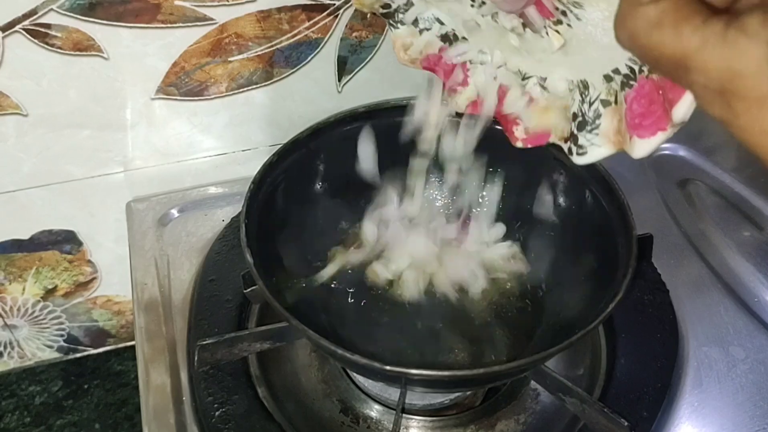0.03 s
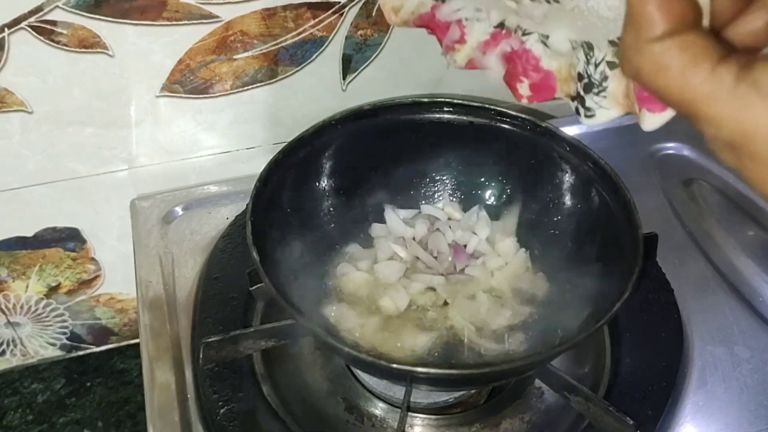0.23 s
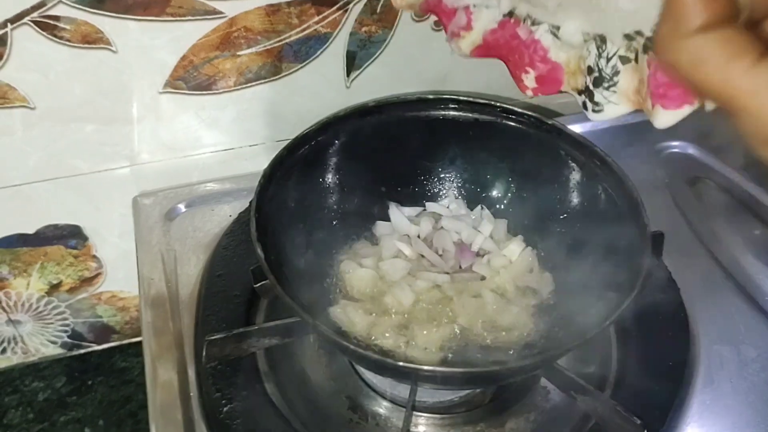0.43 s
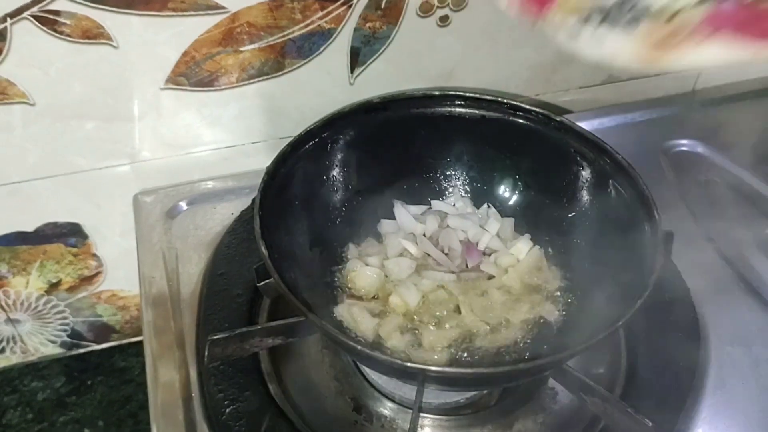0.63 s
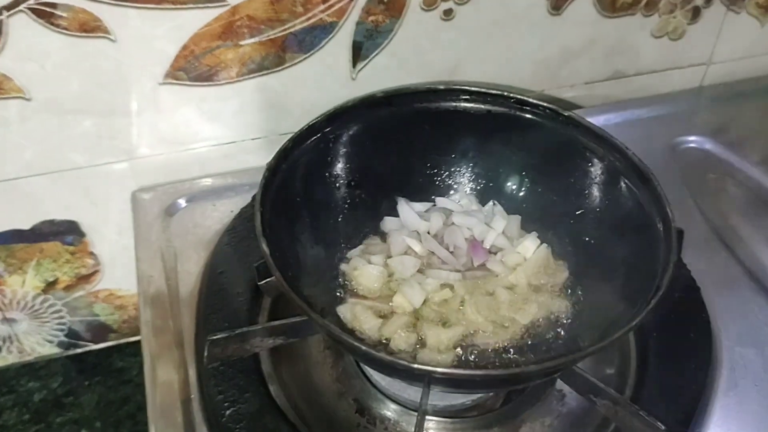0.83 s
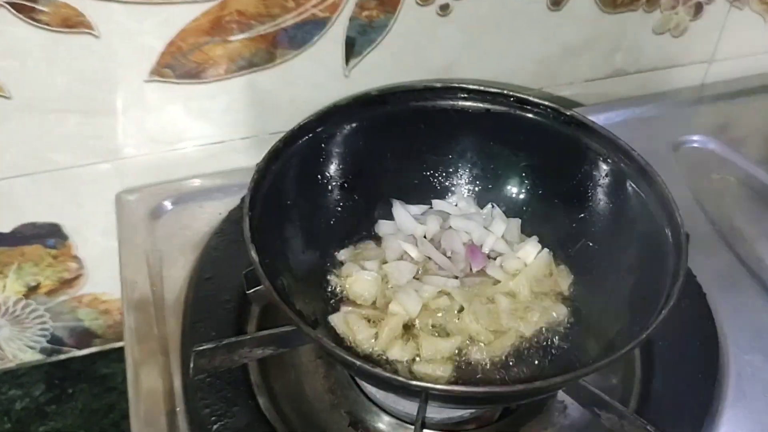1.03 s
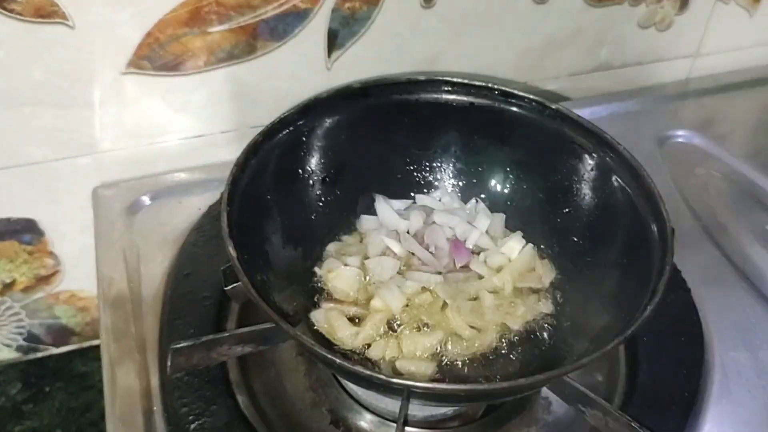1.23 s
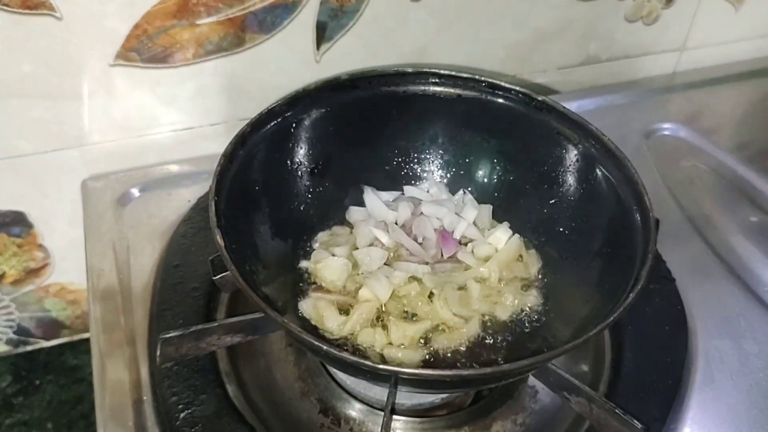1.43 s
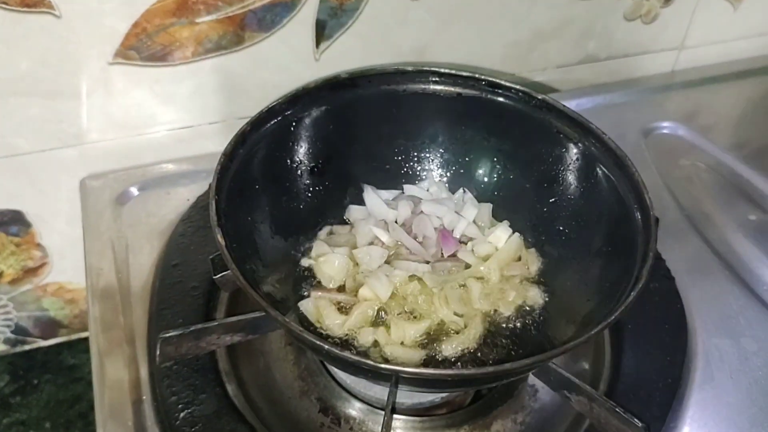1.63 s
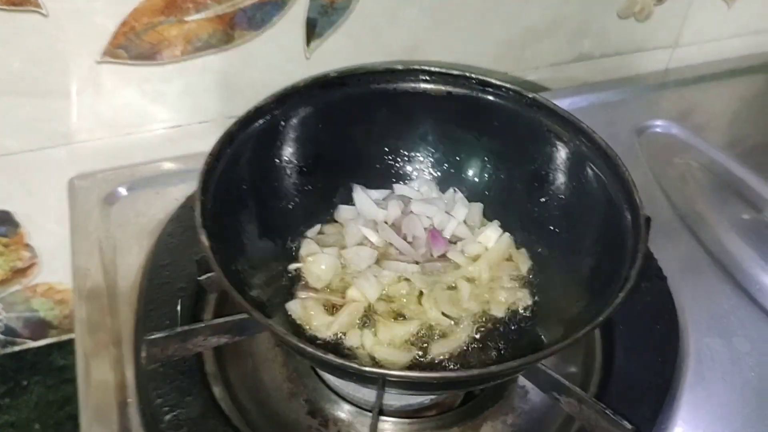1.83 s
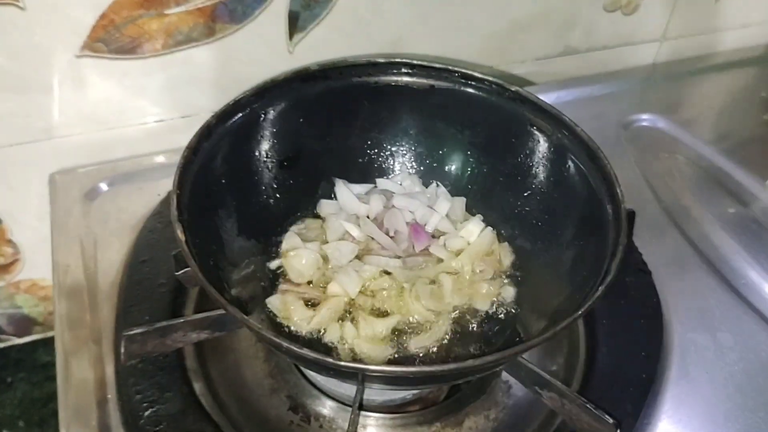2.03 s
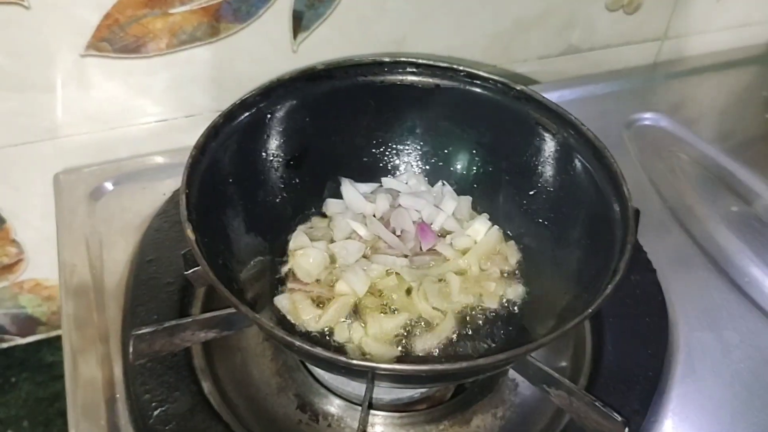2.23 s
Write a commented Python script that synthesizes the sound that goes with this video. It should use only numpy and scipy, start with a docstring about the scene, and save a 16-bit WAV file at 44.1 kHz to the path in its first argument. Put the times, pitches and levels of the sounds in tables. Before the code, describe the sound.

A loud sizzle flares up as chopped onions land softly in a wok of hot oil. It eases into steady frying with scattered pops, heard close in a small kitchen over a faint gas burner rumble.

```python
"""In a small kitchen, chopped onions are tipped into hot oil in a steel wok and land with soft thuds.
Their water flashes to steam: each bursting bubble is a damped oscillation, and thousands a second add
up to a dense fizz. Coarser spatter dies down as the surface dries, and single drops pop out of it.
Reflections from the wok and the tiles prolong the frying. Below it are the rumble of the gas burner,
a faint mains hum and a deeper rumble that swells and fades."""
import sys
import numpy as np
from scipy import signal
from scipy.fft import rfft, irfft, next_fast_len
from scipy.io import wavfile

SR = 44100
rng = np.random.default_rng(int(sys.argv[2]) if len(sys.argv) > 2 else 0)


def pcm_store(signal):
    """Save signal as 16-bit PCM."""
    levels = np.round(np.clip(np.atleast_2d(signal), -1, 1) * 32767)
    wavfile.write(sys.argv[1], SR, levels.astype(np.int16).T)


N = 100283

# Envelope of the fizz (time [s], level [dB])
FIZZ_ENVELOPE = [(0, -72), (.028, -60), (.055, -37), (.072, -27), (.12, -23), (.23, -19), (.33, -19.5),
                 (.5, -21), (.62, -24.5), (.69, -25), (.9, -25), (1.05, -28.5), (1.18, -26), (1.215, -27),
                 (1.55, -29), (1.82, -24.5), (2.03, -27), (2.19, -25), (2.27, -25.5)]
# Spectral weighting of the fizz (frequency [Hz], relative gain [dB])
FIZZ_SPECTRUM = [(200, -47), (750, -30), (1050, -20.5), (1350, -20.5), (1600, -21), (1900, -18.5),
                 (2200, -4.5), (2500, -6), (2850, -10), (3500, -4), (5500, -.5), (10500, 0.5), (13000, 1),
                 (15700, -1.5)]
def fizz():
    """Flash boiling: small steam bubbles burst at the onion's edges, so densely that they fuse."""
    bursts = bubbles(per_s=7000, spread_db=3, ring_s=.00009, top_hz=18130, spots=120, size=64)
    return level(FIZZ_ENVELOPE) * wok_radiation(bursts, FIZZ_SPECTRUM)


# Envelope of the spatter from surface water (time [s], level [dB])
SPATTER_ENVELOPE = [(0, -69), (.05, -53), (.08, -32.5), (.115, -28.5), (.17, -35.5), (.32, -29.5),
                    (.5, -32), (.63, -37.5), (.86, -38), (1.02, -46), (1.16, -44), (1.3, -51),
                    (1.55, -51.5), (1.8, -40.5), (2.27, -61)]
# Spectral weighting of the spatter (frequency [Hz], relative gain [dB])
SPATTER_SPECTRUM = [(150, -40), (500, -15), (740, -21.5), (900, -5), (1100, -2), (1300, -6), (1600, 0),
                    (1900, -4), (2300, 1.5), (3000, -3), (4300, -4), (7000, -4), (15000, -40)]
def spatter():
    """Bubble resonance: fewer, larger bubbles ring lower and longer while the onion is wet."""
    bursts = bubbles(per_s=1100, spread_db=4, ring_s=.00021, top_hz=5970, spots=60, size=96)
    return level(SPATTER_ENVELOPE) * wok_radiation(bursts, SPATTER_SPECTRUM)


def bubbles(per_s, spread_db, ring_s, top_hz, spots, size, boil_s=.4, reflections_db=5.5):
    """Superposition: each boiling spot sends damped sinusoids along its own paths to the ears."""
    life, t = int(boil_s * SR), np.arange(size) / SR
    out = np.zeros((2, N + 2 * life + SR))
    per_spot = int(per_s * (N + life) / SR / spots)
    for start in np.linspace(0, N + life, spots).astype(int):
        onsets = rng.integers(0, life, (per_spot, 1))
        pitch_hz = top_hz * rng.random((per_spot, 1))
        strength = amp(spread_db * np.minimum(rng.standard_normal((per_spot, 1)), 2.5))
        pings = strength * np.sin(2 * np.pi * pitch_hz * t) * np.exp(-t / ring_s)
        train = np.bincount((onsets + np.arange(size)).ravel(), pings.ravel(), life + size)
        paths = amp(reflections_db) * echoes(decay_s=.0016, size=400)  # inside the wok
        paths[[0, 1], rng.integers(0, 12, 2)] += 1  # direct sound, with a delay for each ear
        heard = signal.fftconvolve((train - train.mean())[None], paths, axes=1)
        out[:, start:start + heard.shape[1]] += heard
    return out[:, life:life + N]


# Imbalance of the wok's reflections (frequency [Hz], left minus right [dB])
WOK_BALANCE = [(500, 7), (1000, -7), (1500, 3.5), (1850, 3), (2250, 3), (2800, 1), (5200, 0), (9500, 1.5),
               (14500, -5)]
def wok_radiation(x, spectrum):
    """Directivity: the wok sends each band of the weighted sound more to one side; the rms is 1."""
    return unit(filtered(x, lambda hz: amp(along(spectrum, hz)) * pan(along(WOK_BALANCE, hz))))


# Drops that burst singly
# (time [s], relative peak [dB], centre frequency [Hz], width [octaves], left minus right [dB])
DROP_BURSTS = [(.117, -12.5, 2350, 0.99, 9), (0.2218, -1, 10500, 0.57, 0), (.296, -5, 5100, 0.58, 7),
               (.32, -21, 1210, 0.96, 6), (.342, -2, 9000, 1.2, -2), (0.3866, -4, 9000, 1.2, 0),
               (.423, -6, 9500, 2.2, 6), (0.4381, -6, 6040, 0.57, -6), (0.5173, -9, 5660, 0.55, 0),
               (.552, -15, 4170, 0.47, 1), (0.5664, -3, 7150, 1.6, -10), (0.6643, -5.5, 10000, 0.82, -18),
               (.6657, -6, 1870, 1.2, -1.5), (.668, -9, 4000, 1.9, 2.5), (.684, -5, 7000, 0.97, 2),
               (.7483, -10.5, 5040, .7, 1), (0.7847, -14.5, 3600, 1.2, -1), (0.9217, -16.5, 4500, 0.37, 5),
               (1.0018, -4, 12000, 1.47, 8), (1.0754, -12, 4670, 0.45, 7.5), (1.114, -12.5, 9000, 0.91, 10),
               (1.129, -12.5, 13000, 0.36, 0), (1.145, -11, 3000, 2.4, 2), (1.1622, -13, 2750, 0.6, 4),
               (1.1837, -5, 11500, 1, 2), (1.192, -19, 3500, 0.6, -5), (1.2271, -15, 6200, 0.16, 6),
               (1.41, -20, 4000, 0.78, 4), (1.431, -18, 5040, 1.4, -5), (1.606, -16.5, 2490, 0.81, -7),
               (1.6142, -9, 5450, 0.54, 0), (1.642, -19.5, 1930, .35, -0.5), (1.6507, -6, 9500, 1.1, 0),
               (1.654, -14.5, 10000, 1.2, -12), (1.766, -9, 12000, 0.33, -1),
               (1.7731, -12.5, 4870, 0.46, 6), (1.8303, -10, 11000, .8, -4), (1.8822, -6.5, 8500, 0.96, 0),
               (1.961, -14.5, 8000, 1.4, 6), (2.0073, -15, 11000, 0.52, 2), (2.0888, -15, 4530, 1.3, 3),
               (2.146, -16, 3800, 0.75, 5), (2.1499, -9.5, 4220, 0.92, 1), (2.1738, -11, 12100, 0.6, -9),
               (2.1945, -12, 5140, 0.99, 4)]
def pops(trim_db=-3, snap_s=.00075, ring_s=.0044, ring_db=-5, low_cut_hz=820):
    """Impulse excitation: a drop bursts with a snap of band-limited noise and rings briefly in the wok."""
    size, lead = 1400, 40  # samples; the lead leaves room for the filter's spread
    out, t = np.zeros((2, N + size)), np.arange(size) / SR
    decay = np.exp(-t / snap_s) + amp(ring_db) * np.exp(-t / ring_s)
    for time_s, peak_db, centre_hz, octaves, pan_db in DROP_BURSTS:
        def band(hz):
            bell = np.exp(-.5 * (np.log2((hz + 1) / centre_hz) / octaves) ** 2)
            return bell / (1 + (low_cut_hz / (hz + 20)) ** 10)
        snap = rng.standard_normal((2, size)) * decay
        burst = filtered(np.pad(snap, ((0, 0), (lead, 0)))[:, :size], band)
        burst /= np.abs(burst).max(axis=1, keepdims=True) + 1e-12
        start = round(time_s * SR) - lead
        out[:, start:start + size] += amp(peak_db + trim_db) * pan(pan_db) * burst
    return out[:, :N]


# Spectrum of the thuds (frequency [Hz], relative level [dB])
THUD_SPECTRUM = [(30, -15), (80, -7), (105, -2.5), (140, -2), (185, 0.5), (235, -10.5), (290, 0),
                 (340, -2.5), (410, -11), (520, -13), (700, -11), (1100, -19.5), (3000, -36), (9000, -54)]
def landing(level_db=-37, tumble_s=.092, fade_db_per_s=35):
    """Soft impact: tumbling onion excites the wok's low resonances, which then decay exponentially."""
    after_s = np.maximum(np.arange(N) / SR - tumble_s, 0)
    return amp(level_db - fade_db_per_s * after_s) * shaped_noise(THUD_SPECTRUM)


# Envelope of the flame (time [s], level [dB])
FLAME_ENVELOPE = [(0, -40), (.35, -47), (.62, -47), (.86, -40), (1.03, -45.5), (1.62, -45.5), (1.69, -44),
                  (1.8, -41), (2.08, -46), (2.27, -41.5)]
# Spectrum of the flame (frequency [Hz], relative level [dB])
FLAME_SPECTRUM = [(20, -30), (40, -20), (56, -5), (72, -7.5), (105, 5), (130, -5.5), (190, -5.5),
                  (245, -17), (320, -11), (450, -18), (800, -21.5), (2000, -29.5), (8000, -83)]
def burner(hum_hz=103, hum_db=-56.5):
    """Combustion noise: the gas flame rumbles over a faint pure tone of mains hum."""
    hum = amp(hum_db) * np.sqrt(2) * np.sin(2 * np.pi * hum_hz * np.arange(N) / SR)
    return level(FLAME_ENVELOPE) * shaped_noise(FLAME_SPECTRUM) + hum


# Envelope of the deep rumble (time [s], level [dB])
DEEP_ENVELOPE = [(0, -53), (.25, -54), (.45, -69), (.75, -56), (1.02, -66), (1.12, -50), (1.6, -45.5),
                 (1.69, -52), (2.27, -57)]
# Spectrum of the deep rumble (frequency [Hz], relative level [dB])
DEEP_SPECTRUM = [(20, -29), (32, -11), (42, -12), (53, 4), (64, -14), (90, -39), (200, -38)]
def deep_rumble():
    """Amplitude modulation: a narrow band of low noise swells and fades under the frying."""
    return level(DEEP_ENVELOPE) * shaped_noise(DEEP_SPECTRUM)


def echoes(decay_s, size):
    """Diffuse reflection: exponentially decaying noise of energy 1 for each ear."""
    tail = rng.standard_normal((2, size)) * np.exp(-np.arange(size) / SR / decay_s)
    return tail / np.linalg.norm(tail, axis=1, keepdims=True)


def shaped_noise(spectrum):
    """Spectral shaping: white stereo noise takes on a spectrum, at rms 1."""
    return unit(filtered(rng.standard_normal((2, N)), lambda hz: amp(along(spectrum, hz))))


def filtered(x, response):
    """Linear filtering: the spectrum of x is multiplied by a frequency response."""
    n = x.shape[-1]
    padded = next_fast_len(n + 4096)
    return irfft(rfft(x, padded) * response(np.fft.rfftfreq(padded, 1 / SR)), padded)[..., :n]


def along(points, hz):
    """Interpolation of (frequency [Hz], value) points on a logarithmic axis."""
    frequencies, values = np.transpose(points)
    return np.interp(np.log(hz + 1), np.log(frequencies + 1), values)


def level(points):
    """Interpolation of (time [s], level [dB]) points to a gain per sample."""
    return amp(np.interp(np.arange(N) / SR, *np.transpose(points)))


def pan(difference_db):
    """Interaural level difference, split evenly into left and right gains."""
    return amp(difference_db * np.array([[.5], [-.5]]))


def amp(db):
    """Decibel law: 20 dB is a factor of ten in amplitude."""
    return 10 ** (np.asarray(db) / 20)


def unit(x):
    """Normalisation to rms 1."""
    return x / np.sqrt(np.mean(x ** 2) + 1e-20)


def scene(room_decay_s=.025, room_db=-6):
    """Reverberation: the tiled kitchen echoes the frying, and the low sounds add to it directly."""
    frying = fizz() + spatter() + pops()
    room_response = np.pad(echoes(room_decay_s, size=9000), ((0, 0), (SR // 300, 0)))  # 3.3 ms late
    kitchen = signal.fftconvolve(frying, room_response, axes=1)[:, :N]
    return frying + amp(room_db) * kitchen + landing() + burner() + deep_rumble()


# Stereo width (frequency [Hz], gain of the side signal [dB])
SIDE_GAIN = [(30, -35), (90, -36), (180, -16.5), (350, -9.5), (700, -2.5), (1400, -1), (2800, -1),
             (5000, 0)]
# Overall gain, which dips briefly and partly recovers (time [s], gain [dB])
LEVEL_DIP = [(1.654, 3.5), (1.672, -2), (1.73, -1), (1.765, 1)]
def record(dry, ceiling=.76, top_hz=15850):
    """Spatial coherence: two close microphones receive long waves nearly alike, narrowing the bass."""
    mid = dry.mean(axis=0)
    side = filtered(dry[0] - mid, lambda hz: amp(along(SIDE_GAIN, hz)))
    pair = np.array([mid + side, mid - side]) * level(LEVEL_DIP)
    rounded = pair / (1 + np.abs(pair / ceiling) ** 6) ** (1 / 6)  # soft saturation of the peaks
    return filtered(rounded, lambda hz: hz < top_hz)


dry = scene()
out = record(dry)
pcm_store(out)
```